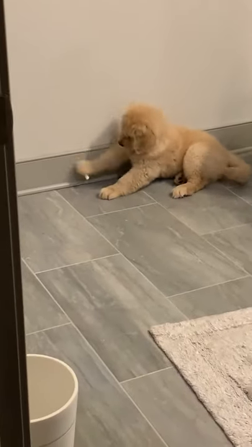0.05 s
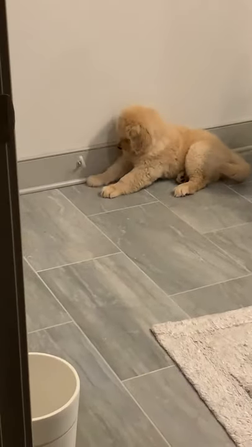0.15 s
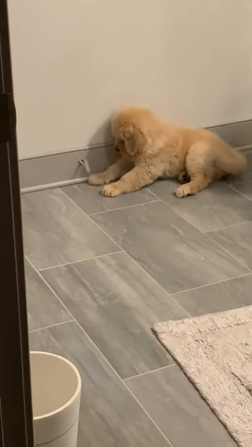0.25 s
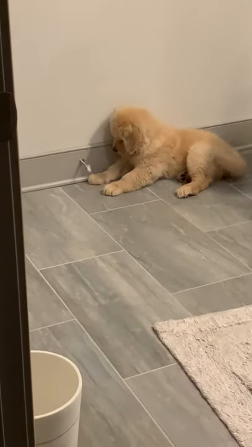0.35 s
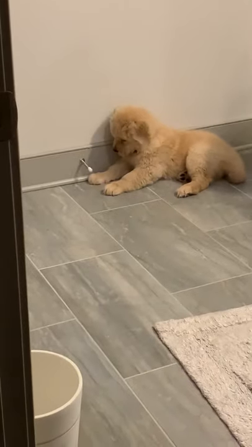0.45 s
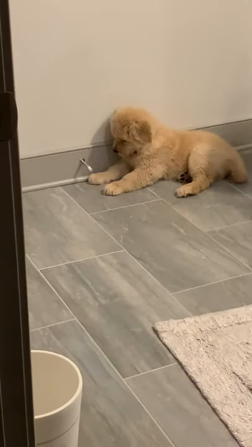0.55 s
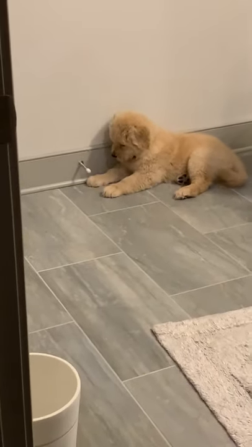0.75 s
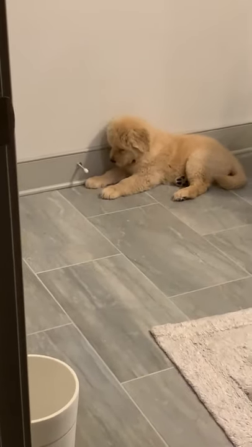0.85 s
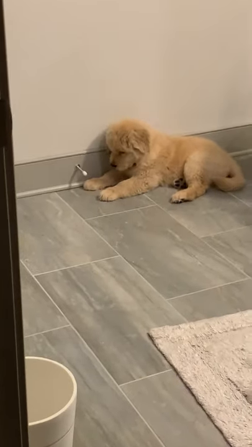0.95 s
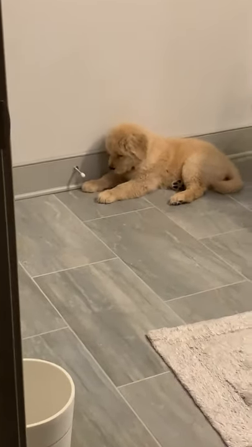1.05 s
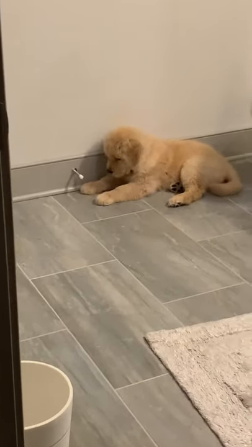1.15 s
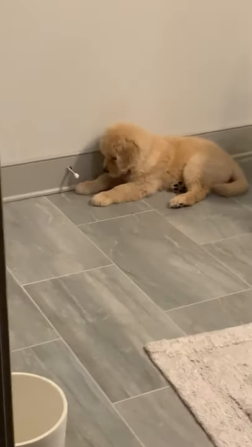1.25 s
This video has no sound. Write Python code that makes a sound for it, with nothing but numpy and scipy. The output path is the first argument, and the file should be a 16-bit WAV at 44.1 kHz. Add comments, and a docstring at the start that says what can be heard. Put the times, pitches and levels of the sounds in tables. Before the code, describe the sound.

A spring door stopper is rubbed and plucked by a puppy's paw, clashes hard with wall thumps, then twangs in rapid quickening pulses that fade; small tiled room, faint low rumble, fairly close stereo microphone.

```python
"""A small tiled room: a puppy paws a spring door stopper on the skirting board.
The paw rubs and slips over the coils; the spring clashes hard, then swings ever faster, later also weaker.
Each contact is a click that rings steel modes, bright ticks and a wash of shaped noise.
Tugs boom the wall, the swing rate hums through it, and a low rumble with a faint hum lies below."""
import sys
import numpy as np
from scipy import signal
from scipy.fft import rfft, irfft
from scipy.io import wavfile

SR = 44100
rng = np.random.default_rng(int(sys.argv[2]) if len(sys.argv) > 2 else 0)


def transcribe(signal):
    """Save signal, clipped to [-1, 1], as a 16-bit WAV file at the path in sys.argv[1]."""
    frames = np.atleast_2d(signal).T
    limited = np.clip(frames, -1, 1)
    pcm = np.round(limited * 32767).astype(np.int16)
    wavfile.write(sys.argv[1], SR, pcm)


N = 57330
T = np.arange(N) / SR   # time of each sample, in s
HZ = np.maximum(np.fft.rfftfreq(N, 1 / SR), 1)   # spectrum frequencies; at least 1 so that the log works

# All table levels are relative: later gains and filters still act on them.
# background rumble: [f/Hz, level/dB per Hz]
RUMBLE_COLOUR = [(20, -27), (40, -10), (60, 7.5), (80, 3), (120, -3), (200, 10), (400, -14), (1300, -13.5),
                 (4000, -48), (15000, -69)]
RUMBLE_DB, HUM_HZ, HUM_DB = -52, 59.5, -78   # rms levels

# loudness of the rubbing paw over time: [t/s, level/dB]
FUR_LEVEL = [(0, -56.5), (.06, -60.5), (.115, -60), (.13, -39.5), (.24, -73), (.3, -72)]
# colour of the rubbing: [f/Hz, level/dB per Hz]
FUR_COLOUR = [(300, -44), (1500, 1.5), (4000, 3), (7500, 0.5), (12000, -5.5), (15000, -6)]

# tugs of the spring's base at the wall: [t/s, level/dB]
THUMPS = [(0.046, -43), (0.126, -29.5), (0.242, -22.5), (.263, -14), (0.303, -13.5), (0.34, -17),
          (0.382, -16.5), (0.427, -15), (0.4468, -18)]
# upper modes of the wall and skirting board: [f/Hz, level/dB, time to fall 60 dB/s]
WALL_MODES = [(262.7, -16, 0.16), (351.9, -24, 0.56)]
# colour of the wall's wash: [f/Hz, level/dB per Hz]
WALL_WASH = [(110, -38), (150, 4), (200, -14), (265, 7), (350, -18), (500, -13.5), (900, -31)]
WALL_WASH_DB = -20
BOOM_HZ, BOOM_WIDTH_HZ, BOOM_PUSH_HZ = 192.3, 22, 30   # main wall resonance, its width, width of the push
SWING_THUMP_DB, THUMP_FADE_DB_PER_S, BACK_THUMP_DB = -42, 36, -1

# hum of the swinging: [multiple of the swing rate, level/dB]
TWANG_HARMONICS = [(7, -1.5), (8, -23.5), (9, 0), (10, -8.5), (11, 0.5)]
TWANG_DB, TWANG_FADE_DB_PER_S, TWANG_WIDTH_HZ = -33.5, 9, 32.2
TWANG_LAG_S, TWANG_ATTACK_S, TWANG_END_S, TWANG_RELEASE_S = 0.03524, 0.013, 1.142, .05

# paw slips over the coils: [t/s, ring level/dB, tick level/dB]
SLIPS = [(0.1248, -46, -35), (.149, -43.5, -43), (.155, -37.5, -27.5), (.192, -36.5, -43),
         (0.198, -32.5, -40)]
# clashes of the freed spring: [t/s, ring level/dB, tick level/dB]
CLASHES = [(.264, -37, -23.5), (0.2713, -42, -21.5), (0.301, -29, -23), (0.3046, -26, -21.5),
           (.350, -36.5, -25), (0.3555, -36.5, -19.5), (.378, -22.5, -19.5), (0.447, -22, -15),
           (.4595, -31, -54)]

# free swinging: start, first period, shortening of each period
SWING_START_S, SWING_S, SWING_SHORTENS_S = .4797, .057, .0017
BACK_SWING, SWING_COUNT = .435, 19   # share of a period until the back swing; number of swings
FADE_START_S, SWING_UNEVEN_DB = 0.83, 1.5
SWING_RING_DB, RING_FADE_DB_PER_S, BACK_RING_DB = -41.5, 42.5, -1.5   # BACK: back swing against forward
SWING_TICK_DB, TICK_FADE_DB_PER_S, BACK_TICK_DB = -35, 77, -5

# sharp tick of steel on steel: [f/Hz, width/Hz, level/dB]
TICK_MODES = [(4300, 1400, -4.5), (7300, 2940, 3.5), (11880, 1230, -4)]
# colour of the tick's wash: [f/Hz, level/dB per Hz]
TICK_WASH = [(2000, -11.5), (4200, -1), (5400, -1), (7200, -9), (9800, -7.5), (12300, -8), (15000, -20)]
TICK_WASH_DB = -20.5

# modes of the steel spring: [f/Hz, level/dB, time to fall 60 dB/s]
SPRING_MODES = [(420, -9, 0.17), (488, -16.5, 0.55), (637.2, -13, 1), (754, -7, 0.5), (880.8, -3.5, 0.6),
                (939, -17, 0.73), (1154, -6, 0.29), (1229, -2.5, 0.12), (1303.2, 0.5, 0.3), (1333, 1, 0.31),
                (1502.4, -5, 0.36), (1757, -4.5, 0.23), (1894, -30, 0.23), (2023, -21, 0.22),
                (2390, -10, 1), (2607, -1.5, 0.18)]
SLIP_MODES_DB, CLASH_MODES_DB, SWING_MODES_DB = -17.5, -13, -8   # how hard each kind of contact drives them
CHATTER_PER_S, CHATTER_S, CHATTER_SHARE = 900, 0.011, 0.37   # touch rate, decay time, share of power
# dense coil and room resonances after slips, clashes and swings: [f/Hz, level/dB per Hz]
SLIP_WASH = [(120, -36), (280, -14), (410, 3.5), (520, -15.5), (700, -2), (900, -19), (1200, 1), (1600, -7),
             (2100, 2.5), (3300, -3.5), (5200, -14), (7000, -18.5), (12000, -37), (15000, -49)]
CLASH_WASH = [(110, -35), (190, -10), (270, 11.5), (400, 6), (560, -1.5), (750, 4), (1000, -6), (1350, -1),
              (2300, 4), (3100, -2), (4300, -8.5), (5400, -18), (7300, -14.5), (12000, -34), (15000, -46)]
SWING_WASH = [(110, -29), (190, 9), (280, 11), (400, -1), (560, -10.5), (900, 2.5), (1350, -1), (2300, -3),
              (3200, -10), (5200, -17.5), (7300, -20), (12000, -44), (15000, -55)]
# how long the slower wash lasts: [f/Hz, time to fall 60 dB/s]
WASH_T60 = [(150, 0.34), (400, 0.72), (1000, 0.88), (2500, 0.53), (6000, 0.72), (14000, 0.37)]
EARLY_DB, EARLY_T60_S, LATE_DB = -4.5, .13, -3.5   # quick first ring of the steel; slower room tail

# how alike the two sides are: [f/Hz, likeness from 0 to 1]
LIKENESS = [(100, 0.93), (250, 0.92), (500, 0.33), (1000, 0.26), (2000, 0.51), (4000, 0.44), (7000, 0.88),
            (10000, 1), (13000, 1)]
# left against right: [f/Hz, level difference/dB]
BALANCE = [(60, -6), (180, -1.5), (280, -5), (500, 0), (1000, 0.5), (2000, -1.8), (4000, 0.1), (12000, 0)]
# phase lag of the right microphone port behind the left: [f/Hz, lag/radians]
RIGHT_LAG = [(100, -1), (1400, 0.36), (2000, 0.7), (2600, 3), (4800, 2), (5500, 4.0), (7200, 6.5),
             (9750, 9.4), (12300, 12), (15000, 16)]
CUTOFF_HZ = 16000


def from_db(db):
    """Turn decibels into gain."""
    return 10 ** (np.asarray(db) / 20)


def at_hz(points, hz):
    """Read a table between its points, on a log-frequency axis."""
    points = np.array(points)
    return np.interp(np.log(hz), np.log(points[:, 0]), points[:, 1])


def t60_from_width(width_hz):
    """A wide resonance dies fast: turn its width into the time to fall 60 dB."""
    return np.log(1000) / (np.pi * width_hz)


def stereo_noise():
    """Spectrum of white noise, partly alike on both sides."""
    mid, side = rfft(rng.standard_normal((2, N)))
    alike = np.clip(at_hz(LIKENESS, HZ), 0, 1)
    return np.sqrt(1 + alike) * mid + np.sqrt(1 - alike) * side * [[1], [-1]]


def coloured(noise, colour):
    """Give a noise spectrum its colour; return sound with rms 1."""
    x = irfft(noise * from_db(at_hz(colour, HZ)), N)
    return x / x.std()


def wash(drive, noise, colour):
    """Dense resonances of coils and tiled room, each octave dying at its own rate."""
    spectrum = rfft(coloured(noise, colour))
    centres = np.geomspace(110, 14080, 8)
    tail = 0
    for hz, share in zip(centres, np.eye(len(centres))):
        # each band fades into its neighbours
        band = irfft(spectrum * np.interp(np.log(HZ), np.log(centres), share), N)
        early = from_db(EARLY_DB - 60 * T / EARLY_T60_S)
        late = from_db(LATE_DB - 60 * T / at_hz(WASH_T60, hz))
        tail = tail + band * (late + early)
    return signal.fftconvolve(drive[None], tail, axes=1)[:, :N]


def ring(drive, modes):
    """Each click sets every mode swinging as a dying sine with its own level."""
    out = 0
    for hz, db, t60 in modes:
        r = np.exp(-np.log(1000) / (t60 * SR))   # shrink per sample
        w = 2 * np.pi * hz / SR   # turn per sample
        mode = signal.lfilter([0, np.sin(w)], [1, -2 * r * np.cos(w), r * r], drive + 1e-18)
        out = out + from_db(db) * mode
    return out


def clicks(s, db):
    """Place a one-sample click at each contact."""
    out = np.zeros(N)
    place = np.clip(np.round(s * SR).astype(int), 0, N - 1)
    np.add.at(out, place, from_db(db))
    return out


def chatter(drive):
    """Each contact spreads along the coils as a dying flurry of small touches."""
    r = np.exp(-1 / (CHATTER_S * SR))
    share = np.clip(CHATTER_SHARE, 0, 1)
    power = signal.lfilter([1 - r], [1, -r], drive ** 2 + 1e-18)
    touches = (rng.random(N) < CHATTER_PER_S / SR) * rng.choice([-1, 1], N)
    flurry = touches * np.sqrt(share * power * SR / CHATTER_PER_S)
    return np.sqrt(1 - share) * drive + flurry


def swings(db, fade_db_per_s, back_db):
    """Two claps a swing; the swings quicken, hold their strength a while and then fade."""
    period = SWING_S - SWING_SHORTENS_S * np.arange(SWING_COUNT)
    out = SWING_START_S + np.cumsum(period) - period
    back = (out + BACK_SWING * period)[:-1]   # the last swing has no way back
    level = db - fade_db_per_s * np.maximum(T - FADE_START_S, 0)
    uneven = rng.normal(0, SWING_UNEVEN_DB, len(out))
    return from_db(level) * (clicks(out, uneven) + clicks(back, back_db))


def room_tone():
    """Low rumble of the house as coloured noise, with a faint steady sine as hum."""
    rumble = from_db(RUMBLE_DB) * coloured(stereo_noise(), RUMBLE_COLOUR)
    hum = from_db(HUM_DB) * np.sqrt(2) * np.sin(2 * np.pi * HUM_HZ * T)
    return rumble + hum


def fur():
    """The paw rubs along the spring: soft coloured noise that follows its level table."""
    level = from_db(np.interp(T, *np.transpose(FUR_LEVEL)))
    rubbing = T < FUR_LEVEL[-1][0]
    return level * rubbing * coloured(stereo_noise(), FUR_COLOUR)


def wall():
    """The hollow wall booms at every tug of the spring's base."""
    swing = swings(SWING_THUMP_DB, THUMP_FADE_DB_PER_S, BACK_THUMP_DB)
    drive = clicks(*np.transpose(THUMPS)) + swing
    # a softened push makes the boom swell before it dies
    push = signal.lfilter(*signal.iirpeak(BOOM_HZ, BOOM_HZ / BOOM_PUSH_HZ, fs=SR), drive)
    boom = ring(push, [(BOOM_HZ, 0, t60_from_width(BOOM_WIDTH_HZ))])
    no_bass = signal.butter(4, 200, "high", fs=SR, output="sos")
    upper = signal.sosfilt(no_bass, ring(drive, WALL_MODES))
    return boom + upper + from_db(WALL_WASH_DB) * wash(drive, stereo_noise(), WALL_WASH)


def twang():
    """Harmonics of the rising swing rate glide one after another through the wall's resonance."""
    elapsed = T - SWING_START_S
    period_squared = SWING_S ** 2 - 2 * SWING_SHORTENS_S * (elapsed - TWANG_LAG_S)
    rate = 1 / np.sqrt(np.maximum(period_squared, SWING_SHORTENS_S ** 2))
    phase = 2 * np.pi * np.cumsum(rate) / SR
    tone = 0
    for multiple, db in TWANG_HARMONICS:
        k = round(multiple)
        off_peak = 2 * (k * rate - BOOM_HZ) / TWANG_WIDTH_HZ
        tone = tone + from_db(db) * np.sin(k * phase) / (1 + off_peak ** 2)
    attack = np.clip(elapsed / TWANG_ATTACK_S, 0, 1)
    release = np.clip((TWANG_END_S - T) / TWANG_RELEASE_S, 0, 1)
    level = from_db(TWANG_DB - TWANG_FADE_DB_PER_S * np.maximum(T - FADE_START_S, 0))
    return tone * attack * release * level


def ticks():
    """The bright edge of every steel contact rings very briefly, then echoes off the tiles."""
    s, _, db = np.transpose(SLIPS + CLASHES)
    drive = clicks(s, db) + swings(SWING_TICK_DB, TICK_FADE_DB_PER_S, BACK_TICK_DB)
    direct = ring(drive, [(hz, level, t60_from_width(width)) for hz, width, level in TICK_MODES])
    return direct + from_db(TICK_WASH_DB) * wash(drive, stereo_noise(), TICK_WASH)


def spring():
    """The steel rings under the paw, the clashes and the swinging."""
    slip = chatter(clicks(*np.transpose(SLIPS)[:2]))
    clash = chatter(clicks(*np.transpose(CLASHES)[:2]))
    swing = chatter(swings(SWING_RING_DB, RING_FADE_DB_PER_S, BACK_RING_DB))
    drive = from_db(SLIP_MODES_DB) * slip + from_db(CLASH_MODES_DB) * clash
    drive = drive + from_db(SWING_MODES_DB) * swing
    coils = stereo_noise()   # the same coils answer all three
    washes = wash(slip, coils, SLIP_WASH) + wash(clash, coils, CLASH_WASH) + wash(swing, coils, SWING_WASH)
    return ring(drive, SPRING_MODES) + washes


def scene():
    """The stopper radiates no deep bass; level and phase place it between left and right."""
    stopper = fur() + wall() + twang() + ticks() + spring()
    no_bass = signal.butter(6, 145, "high", fs=SR, output="sos")
    stopper = signal.sosfilt(no_bass, stopper)
    hz = np.maximum(np.fft.rfftfreq(2 * N, 1 / SR), 1)   # double length leaves room for the lag
    balance = from_db(at_hz(BALANCE, hz) * [[.5], [-.5]])
    lag = np.exp(-1j * at_hz(RIGHT_LAG, hz) * [[0], [1]])
    placed = irfft(rfft(stopper, 2 * N) * balance * lag)[:, :N]
    return room_tone() + placed


def record(dry):
    """A steep low-pass filter cuts off the top."""
    return signal.sosfilt(signal.cheby2(16, 70, CUTOFF_HZ, fs=SR, output="sos"), dry)


dry = scene()
out = record(dry)
transcribe(out)
```